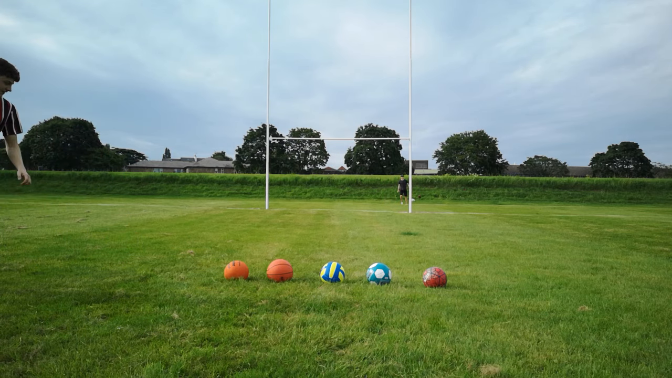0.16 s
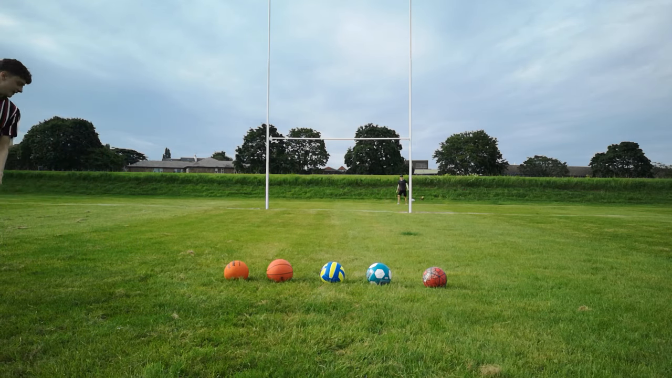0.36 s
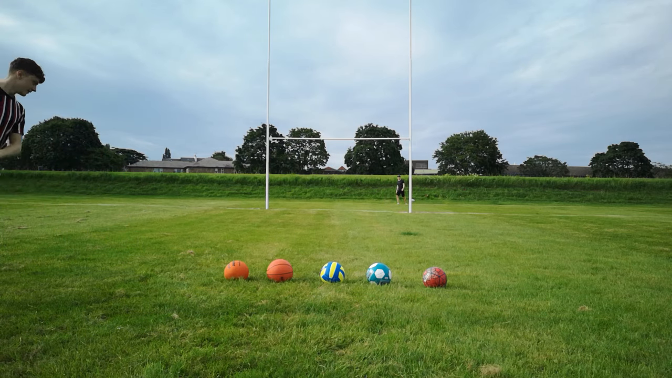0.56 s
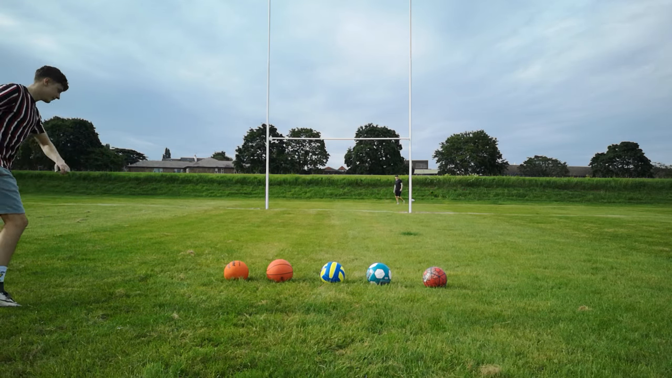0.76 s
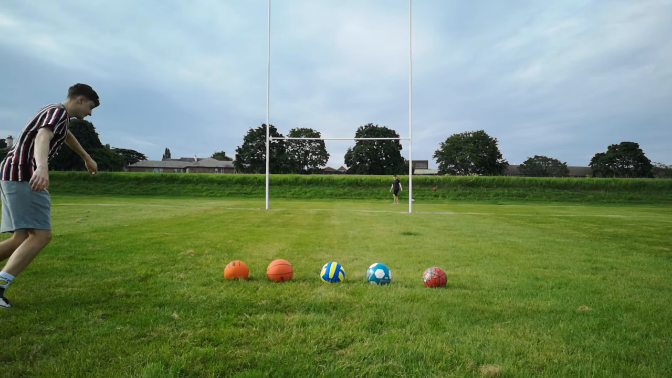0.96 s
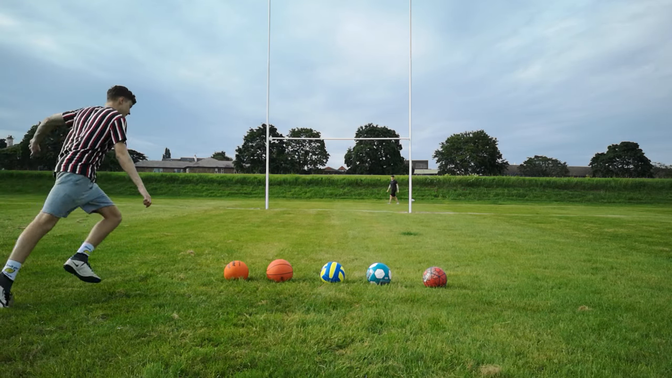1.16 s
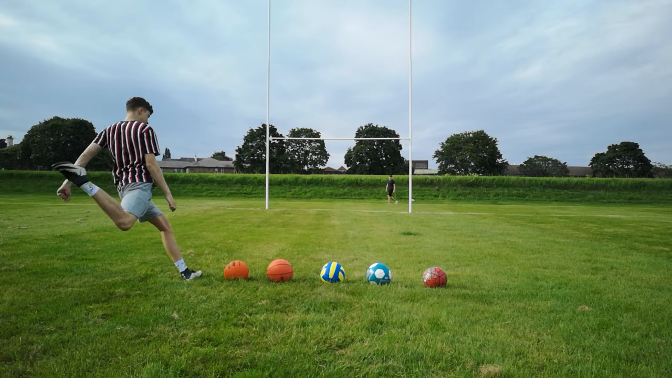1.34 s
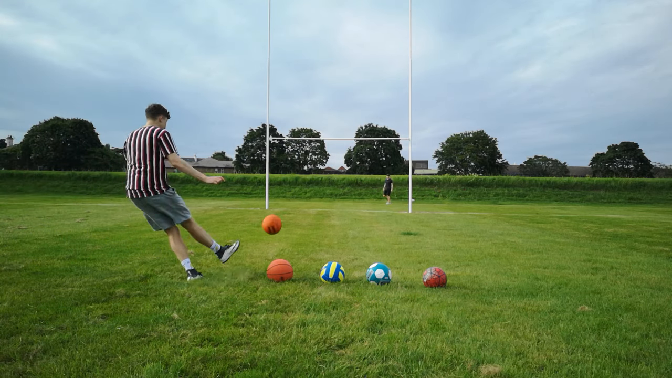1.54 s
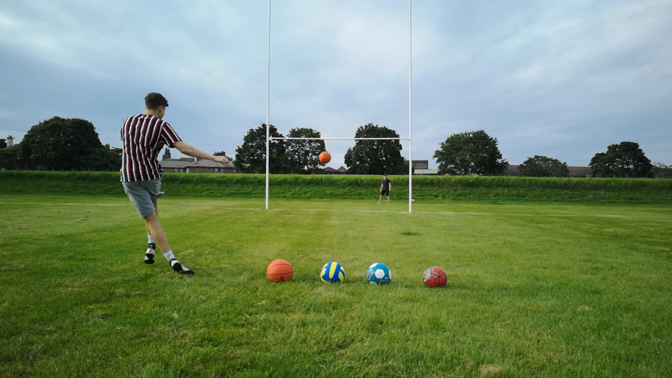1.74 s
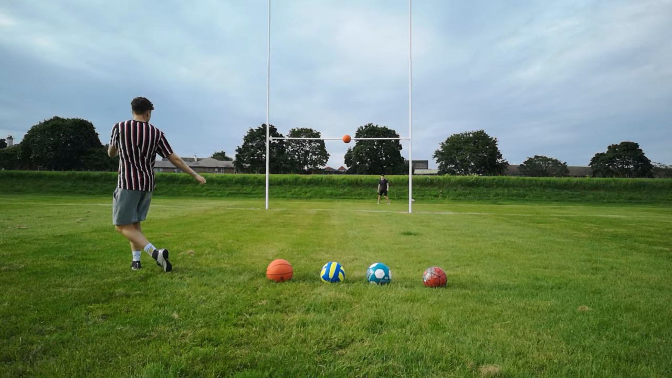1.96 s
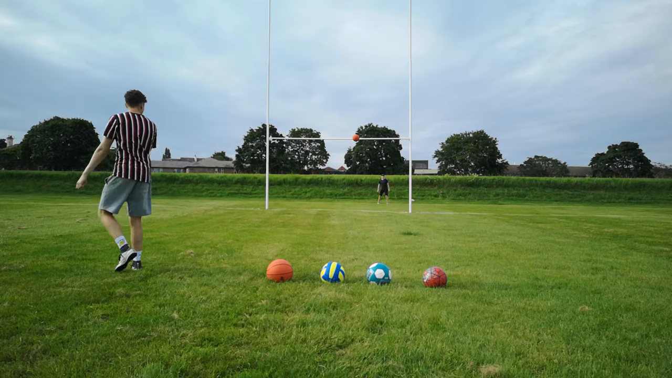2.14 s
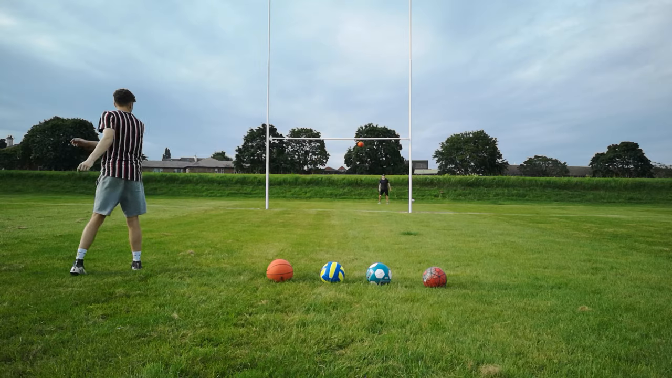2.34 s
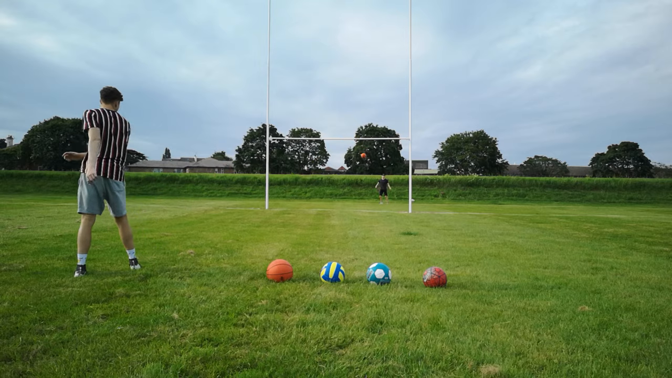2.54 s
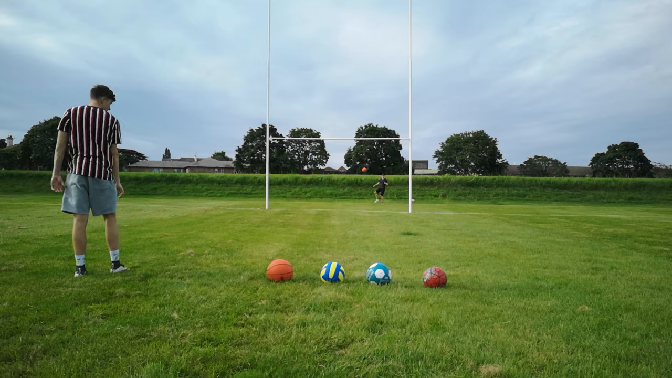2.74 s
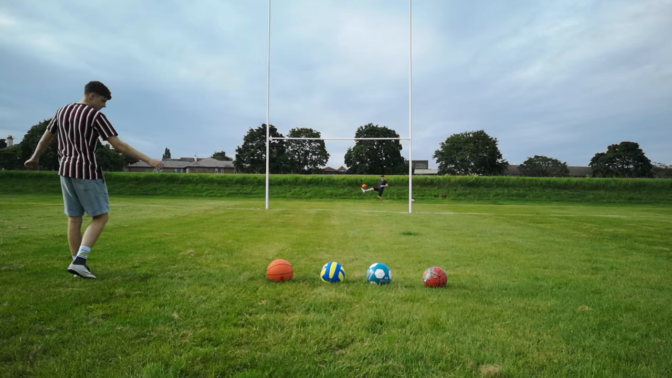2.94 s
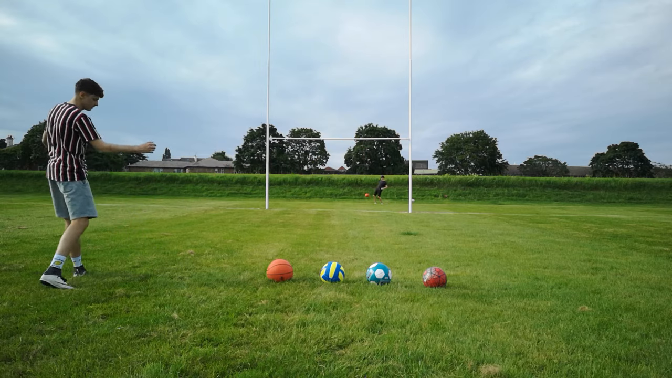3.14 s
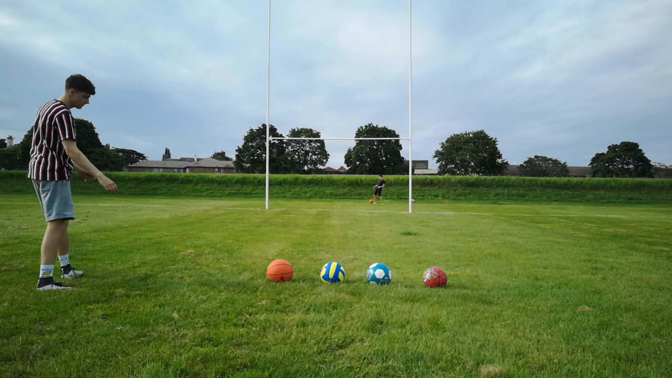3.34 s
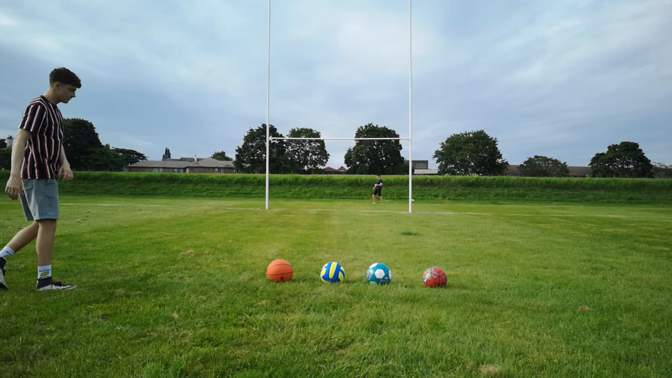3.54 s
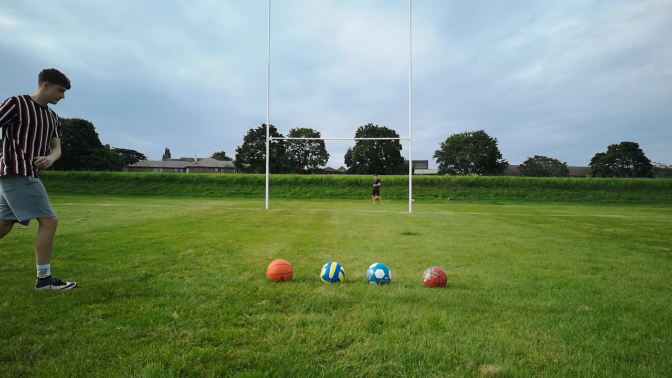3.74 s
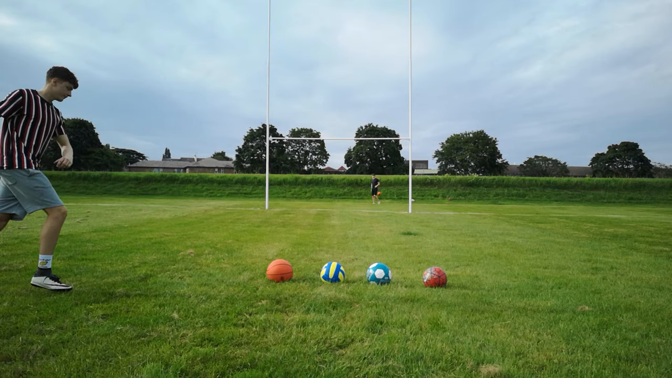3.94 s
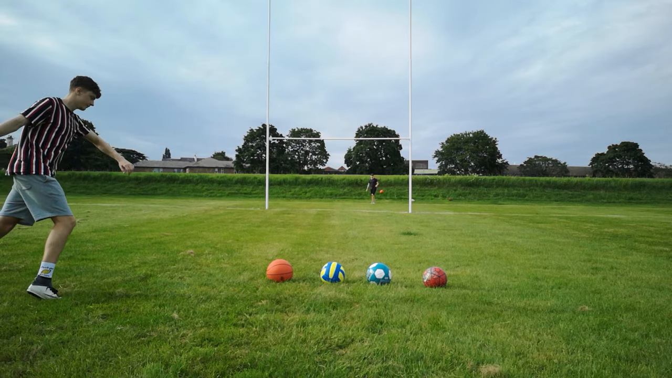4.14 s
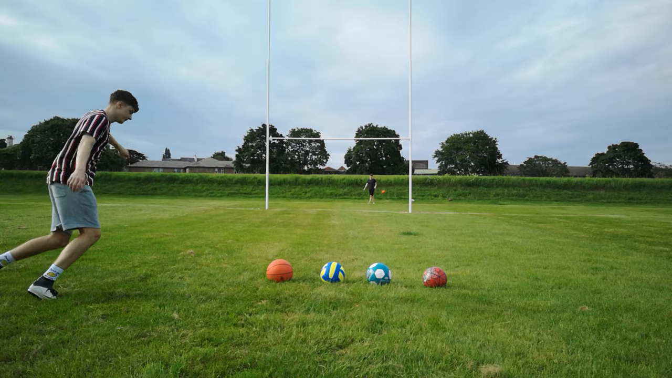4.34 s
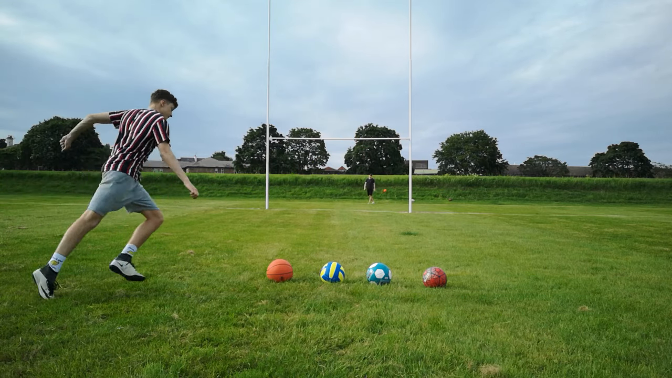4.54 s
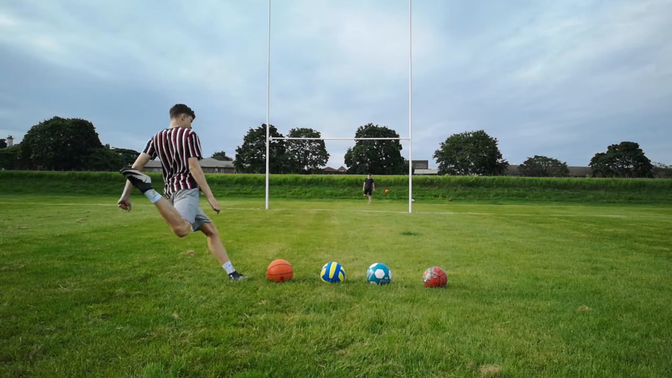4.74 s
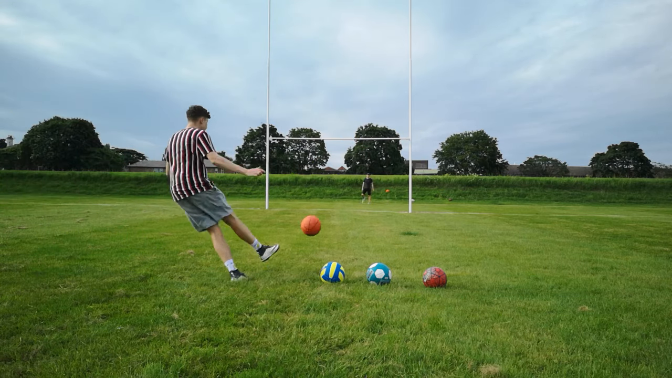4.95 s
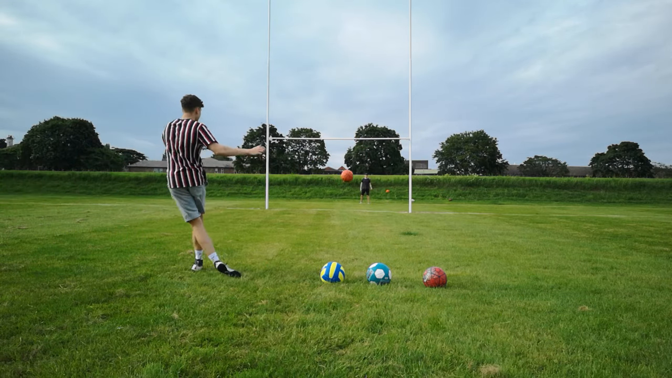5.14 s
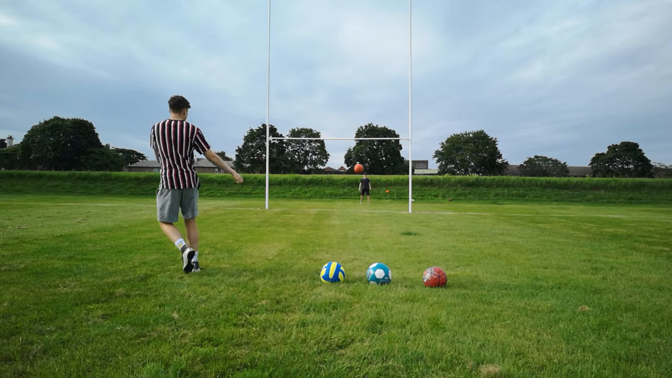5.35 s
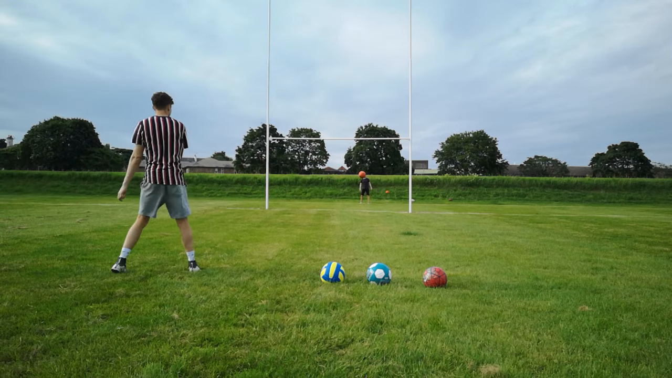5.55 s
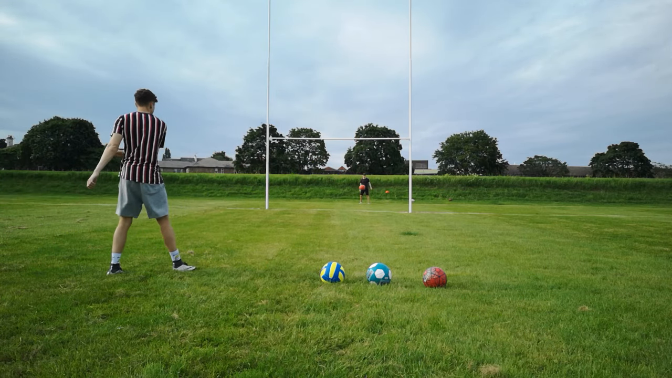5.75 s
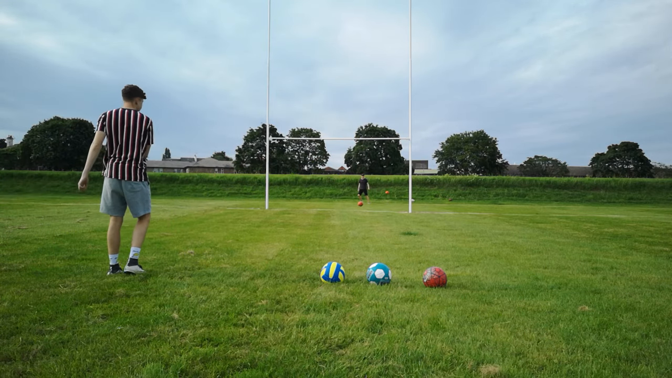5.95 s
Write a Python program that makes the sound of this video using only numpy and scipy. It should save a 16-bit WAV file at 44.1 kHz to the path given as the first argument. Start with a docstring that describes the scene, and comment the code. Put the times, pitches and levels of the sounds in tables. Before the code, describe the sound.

A calm open grass field: low wind rumble, a wide faint hush of distant traffic and barely audible grass stir. A soft footfall at 0.4 seconds and light rustles precede quicker, crunchier steps at 1.2 and 1.4. At 1.56 the first rubber ball is kicked: a very loud, short bass thud with a sharp slap, brief scuff, tiny echoes and a slight hollow ring. Grass swishes and soft steps follow from 1.85, with faint gliding bird whistles from about 2.4 to 4.4. At 3.18 the ball lands, a quiet crisp slap and low thump. Steps resume at 3.26 and 3.96, then a run-up crunches at 4.6 and 4.8. The second kick at 4.95 is equally deep but has a harder slap, clearer echo and longer, faintly wavering hollow ring. A soft step at 5.55 and grass rustles fade into the wind by 6 seconds.

```python
"""Over wind rumble, distant traffic and a far songbird (filtered noise, gliding sines), a player steps through grass.
Soft thumps, scuffs and rustles (swelling noise) lead to the first kick of a rubber ball at 1.6 s.
Each kick is a resonant bass thud, a slap (short noise burst), a faint ring of beating air modes and small echoes.
The first ball lands at 3.2 s with a crisp slap and a low thump; more steps lead to the second kick at 4.9 s."""
import sys
import numpy as np
from scipy import signal
from scipy.fft import rfft, irfft, next_fast_len
from scipy.io import wavfile
from scipy.ndimage import uniform_filter1d

SR = 44100
rng = np.random.default_rng(int(sys.argv[2]) if len(sys.argv) > 2 else 0)


def to_wav(s):
    """Save 16-bit WAV."""
    ch = np.atleast_2d(s).T  # columns
    pcm = np.round(np.clip(ch, -1, 1) * 32767)  # PCM
    wavfile.write(sys.argv[1], SR, pcm.astype(np.int16))


N = 264636
T = np.arange(N) / SR

# Spectra of wind and traffic. Each row: frequency in Hz, relative level in dB.
WIND_TONE = [(12, -11), (25, -2), (50, 3), (110, -5.5), (170, -15.5), (240, -21.5), (350, -38),
             (600, -51.5)]
TRAFFIC_TONE = [(40, -8.5), (150, 1), (280, 3), (500, -4.5), (680, -3), (900, 1), (1900, -0.5), (2500, -2),
                (3400, -8), (5600, -11), (7000, -15), (9200, -18), (11000, -21), (15500, -23)]
# Songbird notes. Each row: start in seconds, length in seconds, start Hz, end Hz, level in dB.
BIRD_NOTES = [(2.371, 0.028, 2424, 2270, -73), (2.45, 0.15, 1930, 1670, -80),
              (2.853, 0.052, 2454, 2250, -70), (3.422, 0.05, 2450, 2290, -73.5),
              (3.538, 0.14, 1945, 2013, -77), (3.836, .055, 2336, 2144, -76),
              (3.926, 0.045, 3780, 4300, -83), (4.117, 0.11, 2340, 2370, -79),
              (4.219, 0.094, 3270, 3190, -82), (4.287, 0.103, 2530, 2320, -77.5)]
# Foot swings through grass. Each row: crest time in seconds, length in seconds, level in dB.
GRASS_SWISHES = [(0.168, 0.23, -81), (0.794, 0.17, -82), (1.227, 0.069, -75), (1.851, 0.23, -76),
                 (2.09, 0.13, -84), (2.887, 0.25, -82.5), (3.41, 0.18, -80), (3.616, 0.2, -81.5),
                 (5.253, 0.31, -79), (5.601, 0.11, -77.5), (5.92, 0.28, -79.5)]
# Spectra of grass rustle and crushed grass. Each row: frequency in Hz, relative level in dB.
RUSTLE_TONE = [(1500, -8.5), (3500, -3.5), (5500, -6), (6800, -6.5), (9300, -1), (11000, -14), (15000, -24)]
CRUNCH_TONE = [(400, -14.5), (1000, 8.5), (2500, 2), (5000, -12), (7000, -12), (9300, -2.5), (11000, -29),
               (15000, -22)]
# Footfalls. Each row: start in seconds, length in seconds, heel thump dB, sole scuff dB, grass crunch dB.
FOOTFALLS = [(0.403, 0.011, -51.5, -84, -97), (1.223, 0.022, -63.5, -60.5, -69),
             (1.415, 0.029, -49, -58.5, -61.5), (1.852, 0.044, -61, -68.5, -89),
             (2.719, 0.021, -59.5, -71, -95), (3.256, 0.059, -65.5, -72, -92),
             (3.96, 0.016, -50, -78.5, -100.5), (4.611, 0.024, -60, -58, -69),
             (4.814, 0.024, -55, -57.5, -63), (5.554, 0.024, -53, -94, -96)]
# Spectrum of the landing slap and grass. Each row: frequency in Hz, relative level in dB.
LANDING_TONE = [(300, -10), (900, -21.5), (1300, -7.5), (1700, -12), (2300, -6.5), (3000, -5), (3400, -9.5),
                (4100, -7), (4900, -14), (5700, -1.5), (6600, -14), (7800, -12), (10500, -26.5),
                (15000, -49)]
# Short echoes of the kicks. Each row: time in seconds, level in dB.
KICK_ECHOES = [(1.6085, -50), (1.6452, -65), (1.6507, -59), (4.9890, -43.5), (5.0442, -54)]
# Spectra of echoes, scuff and scattered tail. Each row: frequency in Hz, relative level in dB.
ECHO_TONE = [(400, -34.5), (1100, -11), (2200, 4), (3500, -9), (6000, -20.5), (9500, -16), (14000, -50.5)]
SCUFF_TONE = [(100, -2), (300, 6), (550, -3), (900, 0.5), (1700, -10), (2500, -14), (5000, -21),
              (7500, -28.5), (9300, -19), (10500, -35), (15000, -48)]
TAIL_TONE = [(30, -7.5), (90, 1), (180, -4), (350, -19.5), (700, -30), (2200, -27), (5000, -33.5),
             (9300, -44), (15000, -60.5)]
# Air modes inside a ball, in Hz before the pitch ratio of each kick.
BALL_MODES_HZ = [431, 915, 1497, 2008, 2530, 2654, 3020, 3252, 3445, 3505, 3828, 3978, 4387, 4958, 5335,
                 5475, 5879]
# Decay and beat of each mode. Each row: dB at first kick and dB at second kick (both before the beat),
# t60 in seconds before the ring time ratio, beat in Hz, time of a beat crest in seconds after the kick.
BALL_MODES = [(-57, -42.5, 0.14, 8.3, .04), (-67, -60.5, 0.62, 6.5, 0.029), (-70, -68, 0.46, 9.7, 0.067),
              (-56.5, -45, .33, 12, 0.061), (-68.5, -54.5, 0.37, 8, 0.064), (-71, -58, 1.5, 5, .2),
              (-70.5, -58, 0.4, 11, 0.066), (-75, -66.5, 1.2, 3.8, 0.17), (-71, -67, .7, 6, 0.13),
              (-63, -65, 0.27, 8, .04), (-80, -74, 1.5, 5.4, 0.052), (-61.5, -57, 0.23, 9, 0.065),
              (-81, -70, .55, 4.2, .05), (-67, -64.5, .4, 8, 0.037), (-79, -68.5, .5, 7, .04),
              (-71.5, -69, .7, 7, .03), (-80.5, -66, 0.41, 9, 0.036)]
# Slap spectra, one list per kick. Each row: frequency in Hz, relative level in dB.
SLAP_TONES = [
    [(200, -19.5), (620, -6), (830, 6), (1200, 3), (1600, -8.5), (2200, 1.5), (2900, -8.5), (3900, -1),
     (4900, -10.5), (5400, -8.5), (6800, -19), (9300, -7), (10500, -22.5), (15000, -35)],
    [(200, -29), (620, -12.5), (950, -3), (1800, -8.5), (2700, -2), (3400, -10.5), (3900, -10),
     (4900, -26.5), (5600, -10.5), (6400, -32), (7700, -14.5), (9400, -5.5), (10300, -24), (15000, -43)],
]
# Kicks. Each row: start in seconds, thud peak dB, push time in ms, abrupt share 0-1, slap dB,
# slap t60 in seconds, scuff dB, scuff t60 in seconds, ring pitch ratio, ring time ratio, tail dB.
KICKS = [(1.5598, -4, 1.1, 0.09, -24.5, .008, -32, .075, 1.098, .5, -44.5),
         (4.9499, -4.5, 1.4, 0.28, -14.5, .005, -30, 0.06, 1.0, 1.0, -39)]

STIR_DB, STIR_SPREAD_DB, STIR_CHANGES_PER_S = -89.5, 3, 5.4
LANDING_S = 3.1772
CONTACT_MS = 11.2  # boot on ball
TOP_HZ = 15900


def undb(db):
    """Decibels to gain."""
    return 10 ** (np.asarray(db) / 20)


def unit(x):
    """Scale to rms 1."""
    return x / np.sqrt(np.mean(x ** 2))


def colour(x, tone):
    """Minimum-phase filter through (Hz, dB) points that keeps the power of white noise."""
    size = 8192
    tone_hz, tone_db = np.transpose(tone)
    bin_hz = np.arange(size // 2 + 1) * SR / size
    gain_db = np.interp(np.log(bin_hz + 1), np.log(tone_hz), tone_db)
    # folding the cepstrum makes the filter causal
    cepstrum = irfft(np.log(undb(gain_db)))[:size // 2]
    cepstrum[1:] *= 2
    response = irfft(np.exp(rfft(cepstrum, size)))
    return signal.oaconvolve(x, response / np.linalg.norm(response))[:N]


def noise(tone):
    """Coloured noise of rms 1."""
    return unit(colour(rng.standard_normal(N), tone))


def wide(tone, side_db):
    """Stereo noise of rms 1; side_db is the side level relative to the middle."""
    middle = noise(tone)
    side = undb(side_db) * noise(tone)
    return unit(middle + side * np.array([[1], [-1]]))


def fade(start_s, t60_s):
    """Sudden start and exponential decay."""
    return (T >= start_s) * np.exp(-np.log(1000) * np.clip((T - start_s) / t60_s, 0, 4))


def swell(start_s, length_s):
    """Quick rise to 1 at a third of the length, then a slower fall."""
    u = np.clip((T - start_s) / (length_s / 3), 0, 20)
    return u * np.exp(1 - u)


def delay(x, ms):
    """Delay by any fraction of a sample, as a phase turn."""
    size = next_fast_len(N + 2048)
    turns = np.arange(size // 2 + 1) * SR / size * ms / 1000
    return irfft(rfft(x, size) * np.exp(-2j * np.pi * turns), size)[:N]


def place(x, pan_db, lag_ms):
    """Positive pan and lag: louder and earlier in the left microphone."""
    left = x * undb(pan_db / 2)
    right = delay(x, lag_ms) * undb(-pan_db / 2)
    return np.array([left, right])


def grain(spread_db):
    """Blades snap one by one: a level that jumps every 64 samples (1.5 ms), rms 1."""
    jumps = np.repeat(rng.standard_normal(N // 64 + 1), 64)[:N]
    return unit(undb(spread_db * jumps))


def burst(start_s, t60_s):
    """Short crackle with an even spectrum and the energy of 1 ms at level 1."""
    size, lead = 1024, 128
    crackle = rng.standard_normal(size) * fade(0, t60_s)[:size]
    spectrum = rfft(np.roll(crackle, lead))
    flat = irfft(spectrum / np.abs(spectrum))
    out, first = np.zeros(N), int(start_s * SR) - lead
    out[first:first + size] = flat * np.sqrt(SR / 1000)
    return out


def air(wind_db=-62.5, traffic_db=-72.0, gust_spread_db=1.16, drift_spread_db=-0.12):
    """Low wind rumble, nearly alike on both sides, under the wide hush of distant traffic."""
    points = rng.standard_normal(size=(2, 30))
    gust, drift = (np.interp(T, np.linspace(0, T[-1], len(row)), row) for row in points)
    wind = undb(wind_db + gust_spread_db * gust) * wide(WIND_TONE, side_db=-26.5)
    traffic = undb(traffic_db + drift_spread_db * drift) * wide(TRAFFIC_TONE, side_db=1.5)
    return wind + traffic


def bird():
    """Faint gliding whistles from the trees, blurred by a decaying noise response."""
    song = 0
    for start_s, length_s, start_hz, end_hz, db in BIRD_NOTES:
        u = np.clip((T - start_s) / length_s, 0, 1)
        cycles = np.cumsum(start_hz + (end_hz - start_hz) * u) / SR
        song = song + undb(db) * np.sin(np.pi * u) * np.sin(2 * np.pi * cycles)
    trees = rng.standard_normal((2, SR // 2)) * fade(0, t60_s=0.29)[:SR // 2]
    blur = signal.fftconvolve(song[None], trees / np.linalg.norm(trees), axes=1)[:, :N]
    return song + undb(-3) * blur


def rustle():
    """Grass hiss swells and fades with each foot swing, over a faint random stir of grass and clothes."""
    turns = rng.standard_normal(size=200)
    wander = np.interp(T * STIR_CHANGES_PER_S, np.arange(len(turns)), turns)
    stir = undb(STIR_DB + STIR_SPREAD_DB * wander)
    swings = sum(undb(db) * np.exp(-(2 * (T - crest_s) / length_s) ** 2)
                 for crest_s, length_s, db in GRASS_SWISHES)
    return np.hypot(stir, swings) * grain(spread_db=2.5) * wide(RUSTLE_TONE, side_db=1)


def steps():
    """Each foot thumps the soil, scuffs it and crushes grass: three bands of swelling noise."""
    heel, sole, blades = (sum(undb(row[k]) * swell(row[0], row[1]) for row in FOOTFALLS) for k in range(2, 5))
    heel_tone = [(30, -4.5), (70, 9.5), (170, 4.0), (300, -32.5), (800, -53)]
    sole_tone = [(100, -19), (220, 10), (400, 2.0), (700, -16.5), (1500, -39), (5000, -37)]
    thumps = heel * noise(heel_tone)
    scuffs = sole * wide(sole_tone, side_db=0)
    crunch = blades * grain(spread_db=3.5) * wide(CRUNCH_TONE, side_db=-0.5)
    return thumps + scuffs + crunch


def landing(hz=112, thump_db=-31.0, overtone_hz=222, overtone_db=-46, slap_db=-41, grass_db=-58, delay_s=0.0023):
    """The first ball slaps the turf, then squashes and rebounds: a soft thump with a hollow overtone."""
    start_s = LANDING_S + delay_s
    cycles = np.clip((T - start_s) * hz, 0, 3 / 2)
    thump = undb(thump_db) * np.sin(2 * np.pi * cycles) * np.exp(-.25 * cycles)
    overtone = swell(start_s, length_s=0.013) * np.sin(2 * np.pi * overtone_hz * (T - start_s))
    thump = thump + undb(overtone_db) * overtone
    slap = undb(slap_db) * colour(burst(LANDING_S, t60_s=.009), LANDING_TONE)
    grass = undb(grass_db) * fade(LANDING_S, t60_s=0.066) * noise(LANDING_TONE)
    return uniform_filter1d(thump, size=90) + place(slap + grass, pan_db=3.5, lag_ms=.012)


def echoes():
    """Nearby surfaces throw back the slap without its bass."""
    slaps = sum(undb(db) * burst(start_s, t60_s=0.0054) for start_s, db in KICK_ECHOES)
    return place(colour(slaps, ECHO_TONE), pan_db=3, lag_ms=.04)


def thud(start_s, push_ms, abrupt, hz=112, q=1.7, lead_ms=.9, lead=.3, release_ms=4,
         low_hz=38, top_hz=550, skin_hz=4000):
    """The boot dents the ball, which sucks in air and swings back: a push through a resonance, peak 1."""
    ms = (T - start_s) * 1000
    before = ms < 0
    decay_ms = np.where(before, lead_ms, push_ms)
    push = np.where(before, lead, 1) * np.exp(-np.minimum(np.abs(ms) / decay_ms, 40))
    push[int(start_s * SR)] += abrupt * push.sum()
    swing = signal.lfilter(*signal.iirpeak(hz, q, fs=SR), -push)
    # the swing dies quickly once the ball has left the boot
    swing = swing * np.exp(-np.clip((ms - CONTACT_MS) / release_ms, 0, 20))
    # so small a source radiates little deep bass, and soft rubber little treble
    swing = signal.lfilter(*signal.butter(1, [low_hz, top_hz], "band", fs=SR), swing)
    swing = signal.lfilter(*signal.butter(1, skin_hz, fs=SR), swing)
    return swing / np.abs(swing).max()


def ring(start_s, pitch, hold, index, depth=0.72, build_s=0.041):
    """Air in the freed ball rings on, beating as it spins away; a smaller ball rings higher."""
    out, first = np.zeros(N), int(start_s * SR)
    t = T[:min(SR, N - first)]
    for hz, (*levels_db, t60_s, beat_hz, crest_s) in zip(BALL_MODES_HZ, BALL_MODES):
        beat = 1 + depth * np.exp(2j * np.pi * beat_hz * (t - crest_s))
        decay_per_s = np.log(1000) / (t60_s * hold)
        mode = np.exp((2j * np.pi * hz * pitch - decay_per_s) * t)
        out[first:first + len(t)] += undb(levels_db[index]) * np.imag(beat * mode)
    return out * np.clip((T - start_s) / build_s, 0, 1)


def kicks():
    """Thud, slap, scuff of the ball leaving the boot, ring, and sound scattered back by the field."""
    out = 0
    scuff = wide(SCUFF_TONE, side_db=-7.5)
    tail = wide(TAIL_TONE, side_db=-9.5)
    for k, row in enumerate(KICKS):
        (start_s, thud_db, push_ms, abrupt, slap_db, slap_t60_s,
         scuff_db, scuff_t60_s, pitch, hold, tail_db) = row
        out = out + place(undb(thud_db) * thud(start_s, push_ms, abrupt), pan_db=0, lag_ms=.4)
        slap = undb(slap_db) * colour(burst(start_s + 0.00034, slap_t60_s), SLAP_TONES[k])
        # a weaker, duller copy of the slap as the ball leaves the boot
        release = undb(-19) * uniform_filter1d(delay(slap, CONTACT_MS), size=7)
        out = out + place(slap + release, pan_db=5.0, lag_ms=0.039)
        out = out + undb(scuff_db) * fade(start_s, scuff_t60_s) * scuff
        out = out + place(ring(start_s, pitch, hold, index=k), pan_db=1.0, lag_ms=.06)
        out = out + undb(tail_db) * fade(start_s, t60_s=.27) * tail
    return out


def scene():
    """Everything on the field, in stereo."""
    return air() + bird() + rustle() + steps() + landing() + echoes() + kicks()


def record(dry):
    """Steep elliptic low-pass: the microphones pass little above TOP_HZ."""
    return signal.sosfilt(signal.ellip(8, .2, 70, TOP_HZ, fs=SR, output="sos"), dry)


dry = scene()
out = record(dry)
to_wav(out)
```